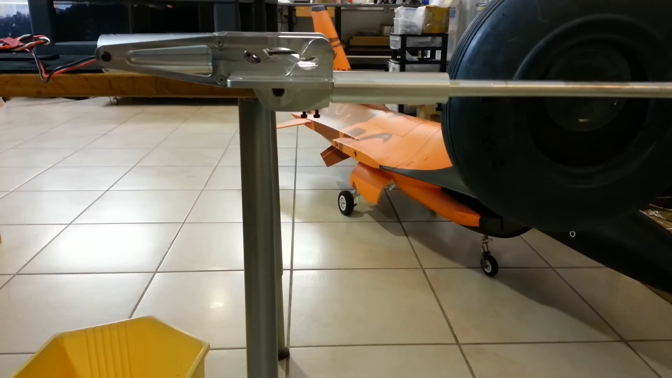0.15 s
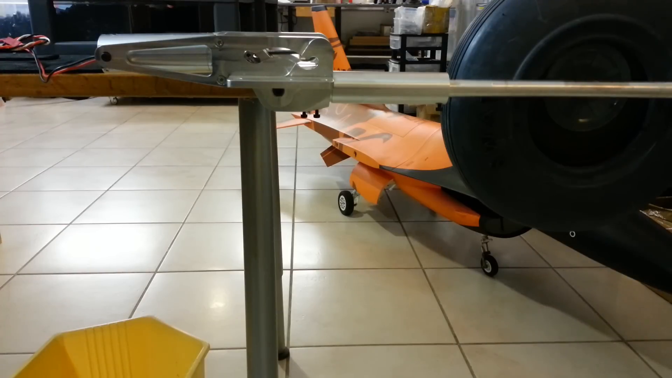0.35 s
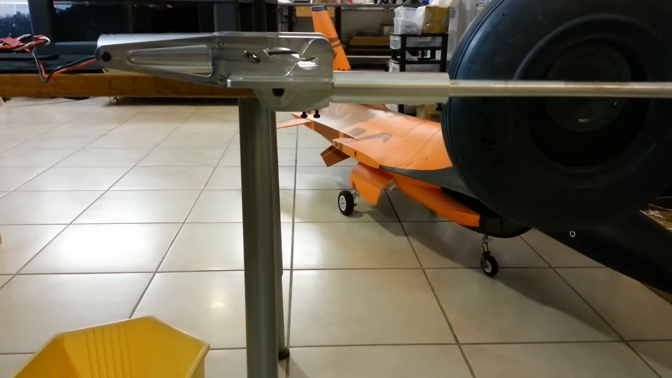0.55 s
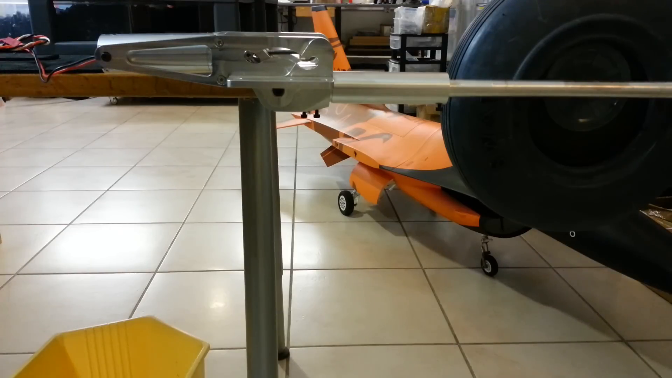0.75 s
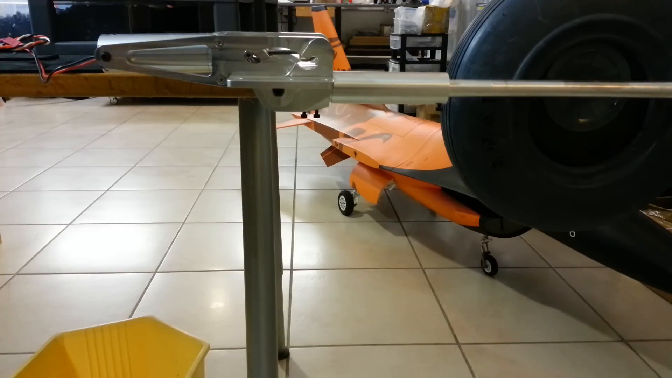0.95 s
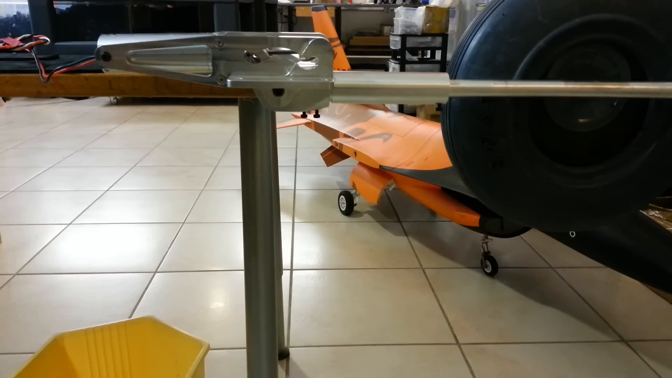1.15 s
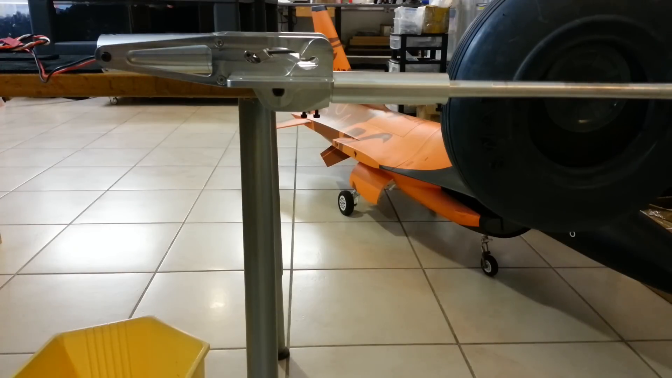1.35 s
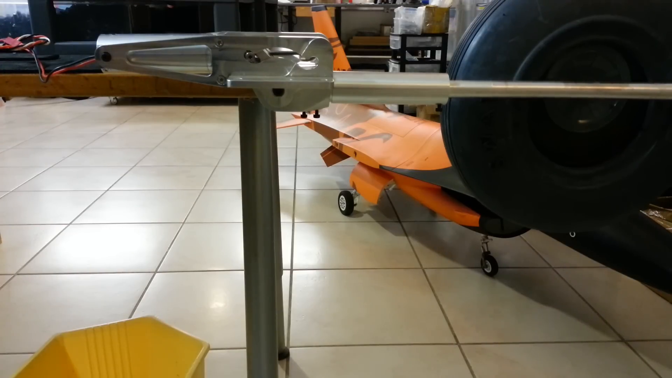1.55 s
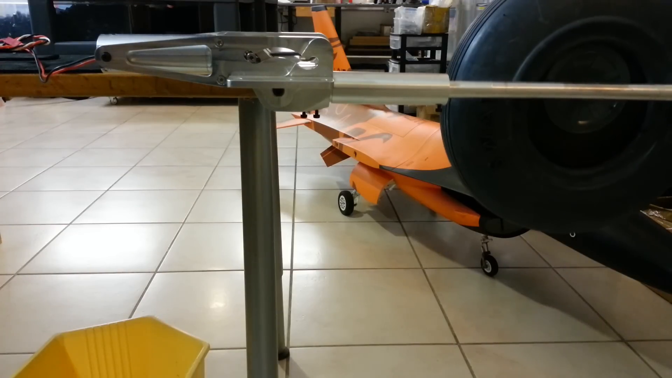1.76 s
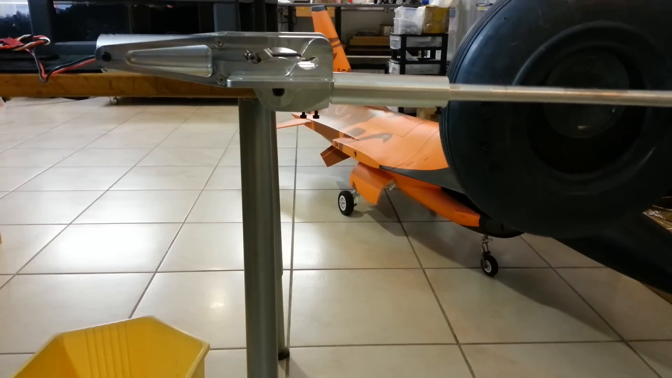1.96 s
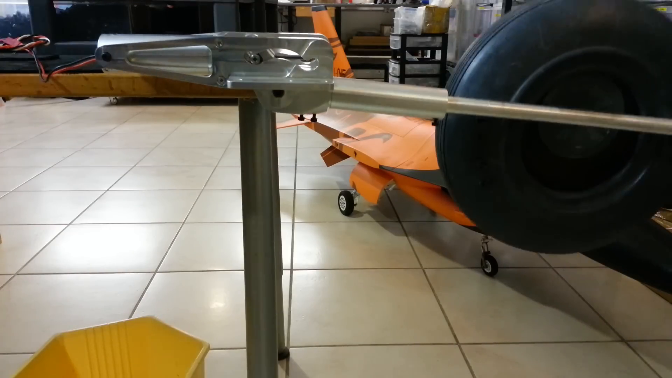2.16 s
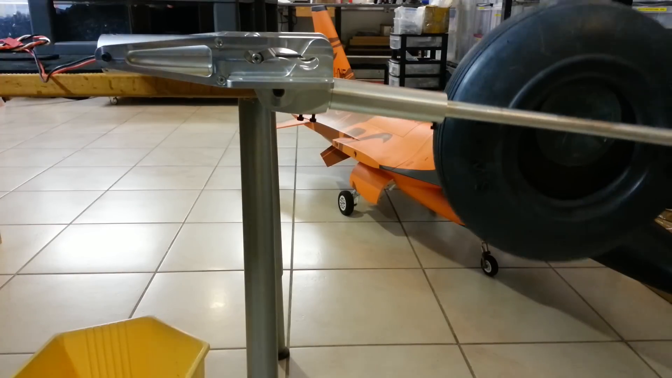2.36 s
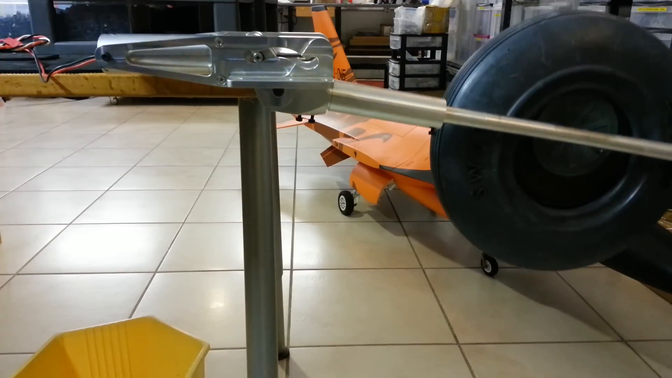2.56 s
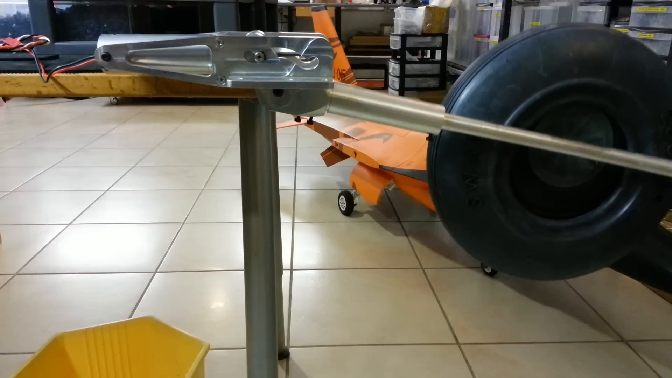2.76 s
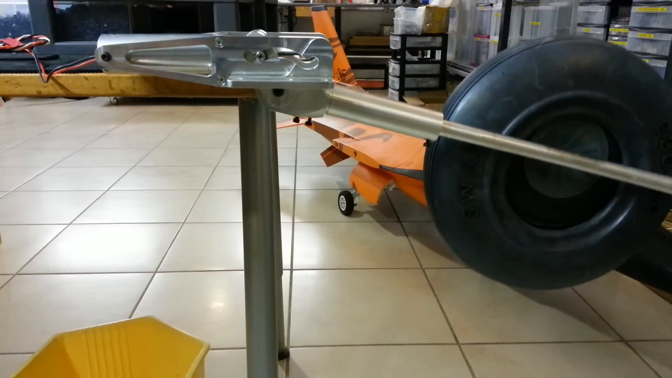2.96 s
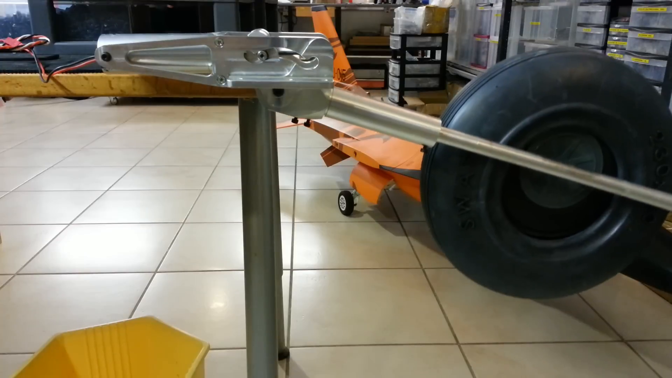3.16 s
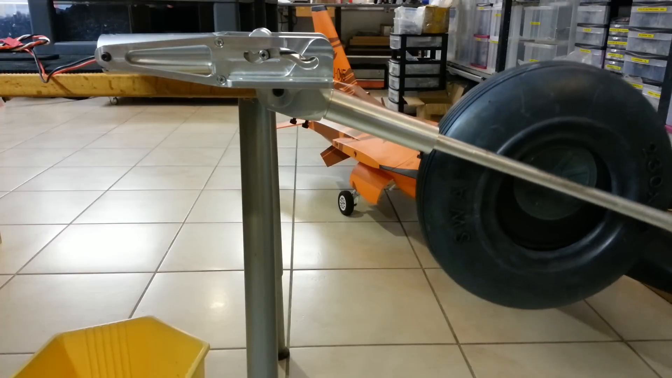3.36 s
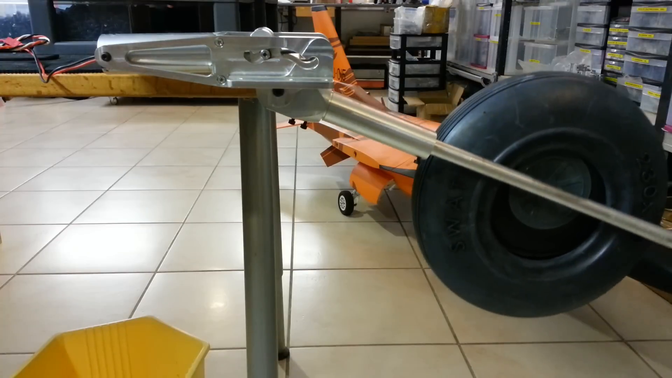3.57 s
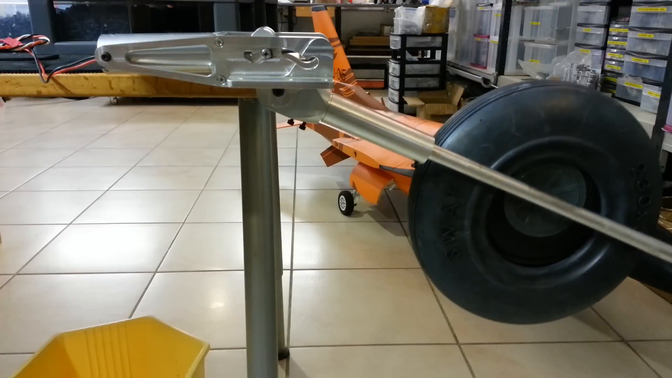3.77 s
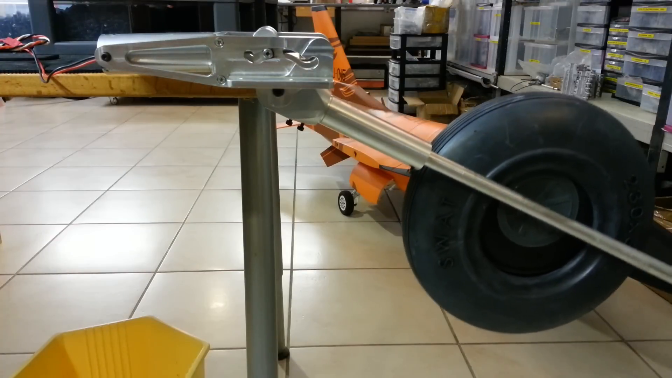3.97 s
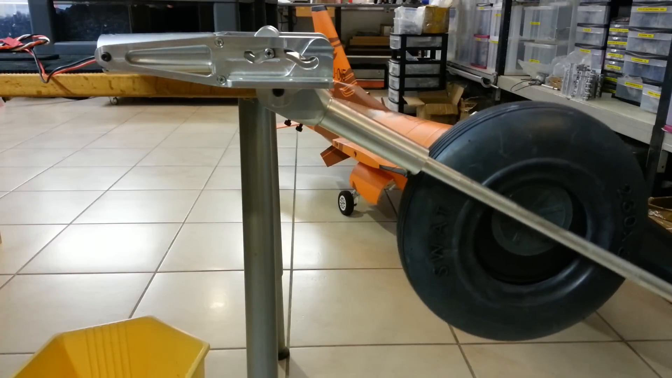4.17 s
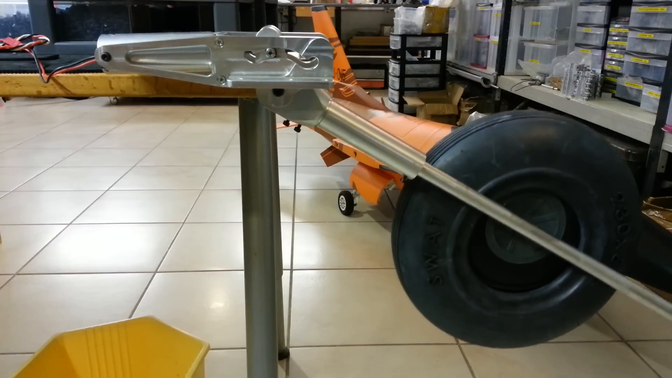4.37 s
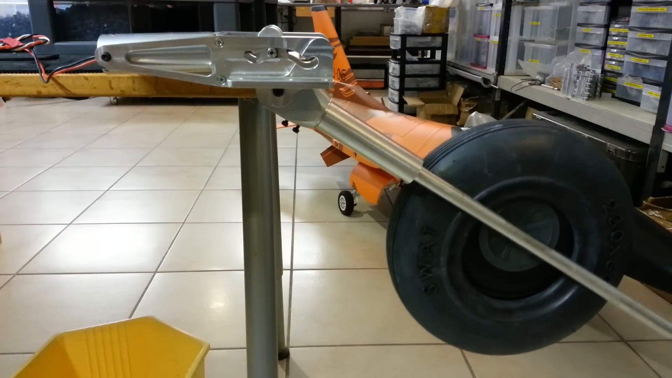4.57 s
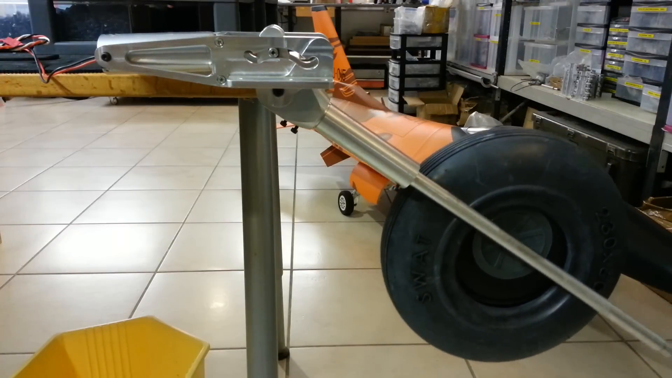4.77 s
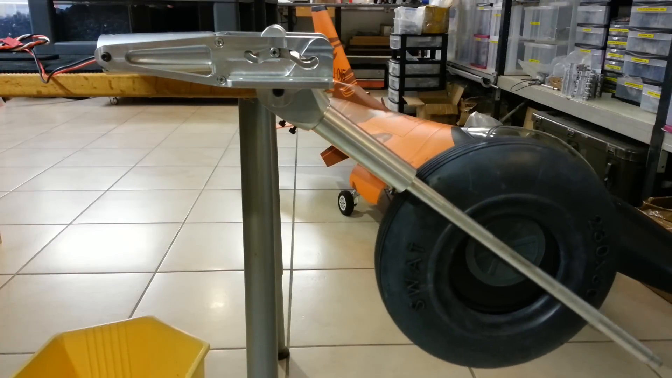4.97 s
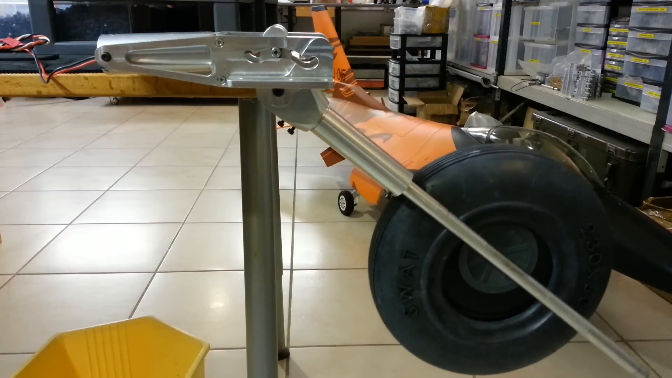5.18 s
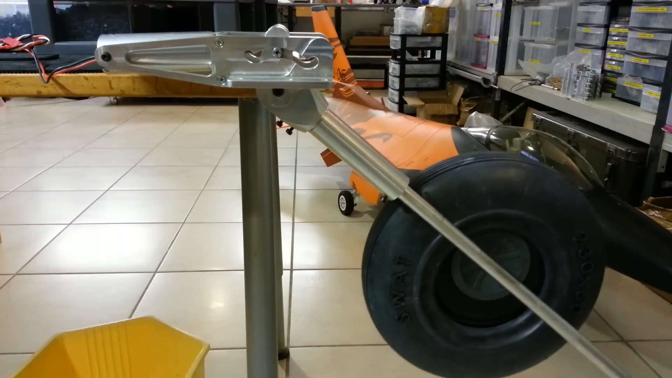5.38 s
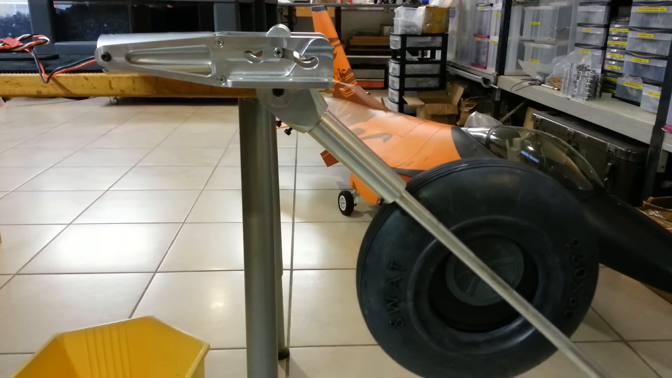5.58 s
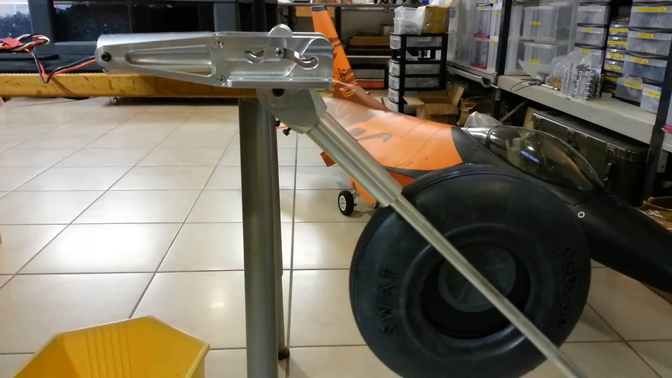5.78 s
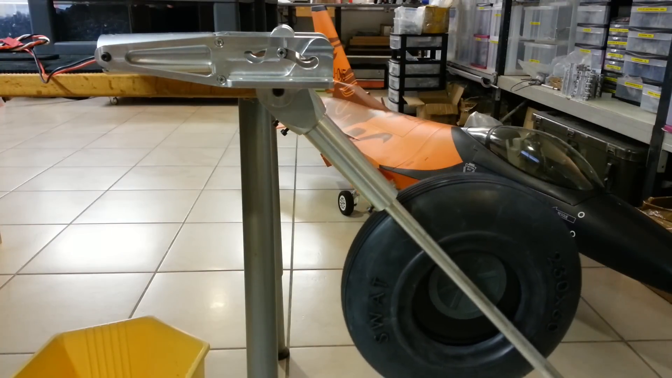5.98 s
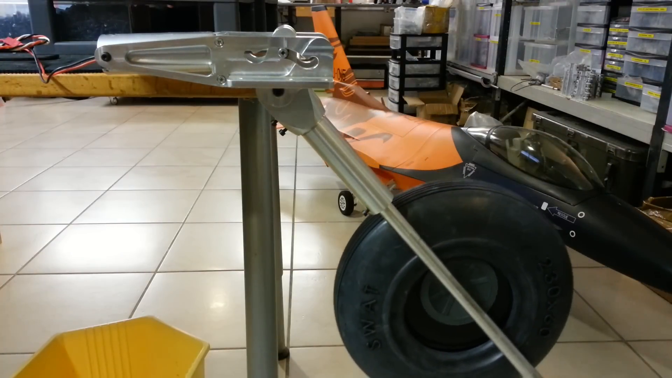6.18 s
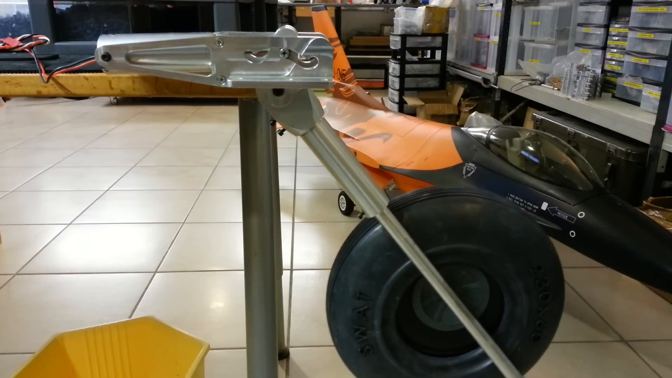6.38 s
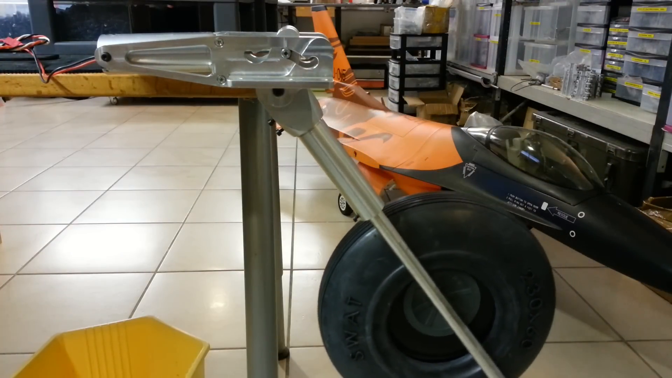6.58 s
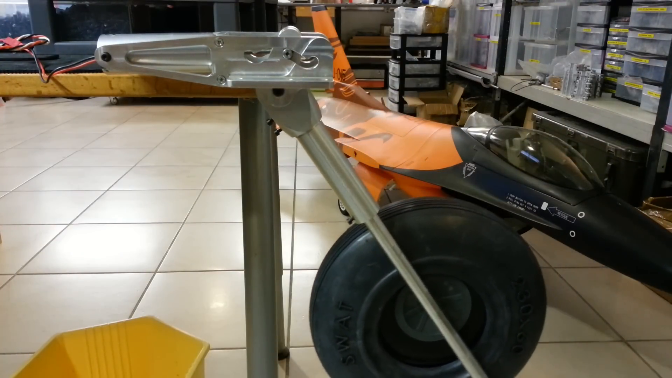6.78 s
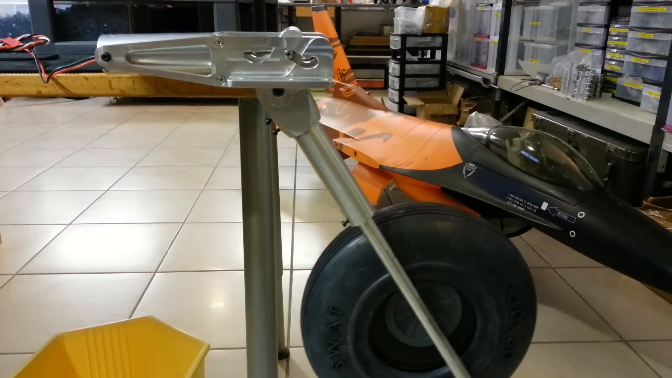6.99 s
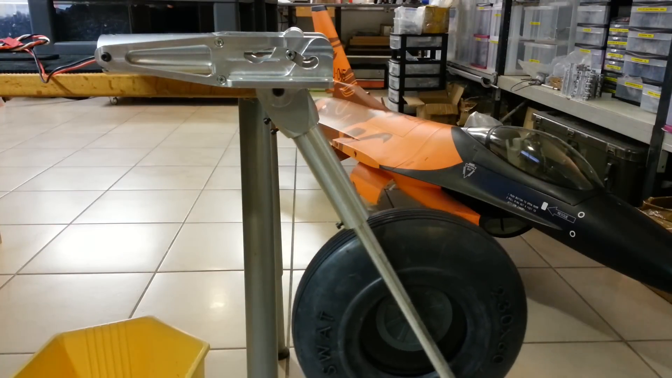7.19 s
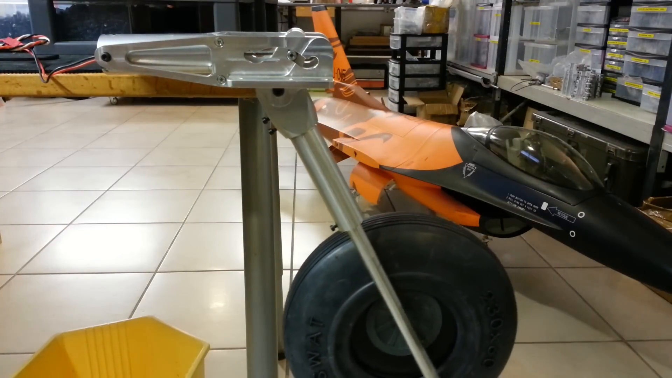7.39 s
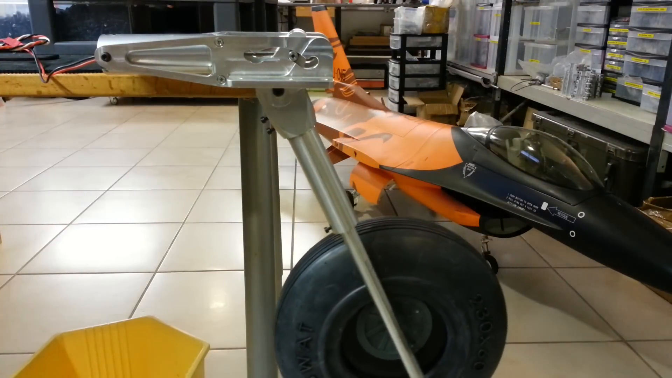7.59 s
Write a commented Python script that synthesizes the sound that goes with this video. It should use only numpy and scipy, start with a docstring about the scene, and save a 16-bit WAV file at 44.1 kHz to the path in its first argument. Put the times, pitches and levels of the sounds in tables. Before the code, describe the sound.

In a quiet workshop, faint ticks and a soft dull bump precede a small geared electric motor very close to the microphone. It spins up quickly, strains and drops in pitch, then the heavy wheel leg falls into its play with a sharp steel clack and brief rattle. A steady, raspy high whine with gear grinding continues to the end, joined by short soft chirps.

```python
"""Faint ticks and a soft bump over a quiet room hum, then a small geared electric actuator close by
swings a heavy wheel leg down on a workshop stand. The motor spins up, sags under load, lets the leg drop
into its play with a clack and a rattle, then whines steadily, with soft chirps near the end.
One shaft angle drives the tones and gear modulation; shaped noise makes the rasp, grinding and impacts."""
import sys
import numpy as np
from scipy import signal
from scipy.fft import rfft, irfft, next_fast_len
from scipy.io import wavfile
from scipy.ndimage import map_coordinates

SR = 44100
rng = np.random.default_rng(int(sys.argv[2]) if len(sys.argv) > 2 else 0)


def master(y):
    """Save y as 16-bit WAV."""
    cut = np.clip(np.atleast_2d(y).T, -1, 1)
    pcm = np.round(cut * 32767)  # scale
    wavfile.write(sys.argv[1], SR, pcm.astype(np.int16))


N = 336924

# brush and gear rasp spectrum: freq_hz, relative_db
RASP_SPECTRUM = [(1500, -53), (4500, -10.5), (6000, -9.5), (6700, 0.5), (7400, 0), (8000, -3.5),
                 (8500, -7.5), (9300, -4.5), (10000, -12), (11300, -18.5), (12400, -37), (13400, -24),
                 (14000, -22), (14600, -45)]
# motor starts to work against the leg: start_s, end_s
STRAINING_S = (1.48, 1.63)
# leg passes from high to midway: start_s, end_s
SINKING_S = (3.65, 4.55)
HIGH_ORDER = 8  # multiple of shaft speed above which tones need load or strain to sound
SIDES = np.array([[-1], [1]])  # left, right


def amp(db):
    """Amplitude factor of a level in dB."""
    return 10 ** (np.asarray(db) / 20)


def unit(x):
    """x scaled to rms 1."""
    return x / np.sqrt(np.mean(x ** 2) + 1e-20)


def along(points, hz):
    """Interpolate (freq_hz, value) points on a log frequency axis."""
    freq_hz, value = np.transpose(points)
    return np.interp(np.log(hz + 1), np.log(freq_hz + 1), value)


def curves(rows):
    """One value per sample for each column after the time."""
    time_s, *columns = np.transpose(rows)
    return [np.interp(np.arange(N) / SR, time_s, column) for column in columns]


def ramp(start_s, end_s):
    """0 before the start, 1 after the end, straight in between."""
    return np.clip((np.arange(N) / SR - start_s) / max(end_s - start_s, 1 / SR), 0, 1)


def swells(rows):
    """Level change in dB from bell-shaped (peak_s, change_db, rise_s, fall_s) swells."""
    t = np.arange(N) / SR
    return sum(db * np.exp(-((t - s) / np.where(t < s, rise, fall)) ** 2) for s, db, rise, fall in rows)


def wobble(rate):
    """Smooth random curve, rate knots a second."""
    count = int(N * rate / SR) + 4
    fine = np.arange(count * 8) / 8
    curve = map_coordinates(rng.standard_normal(count), [fine])
    return np.interp(np.arange(N) * rate / SR, fine, curve)


def filtered(x, response):
    """x times a response of frequency."""
    m = next_fast_len(N + SR // 2)
    return irfft(rfft(x, m) * response(np.fft.rfftfreq(m, 1 / SR)), m)[..., :N]


def noise(spectrum, drive=1, mono_hz=550):
    """Stereo noise of rms 1, alike on both sides in the bass and unrelated above."""
    mid, side = rng.standard_normal((2, N)) * drive
    side = filtered(side, lambda hz: np.sqrt((0.45 + (hz / mono_hz) ** 4) / (2 + (hz / mono_hz) ** 4)))
    pair = np.array([mid + side, mid - side])
    return unit(filtered(pair, lambda hz: amp(along(spectrum, hz))))


def blows(rows):
    """Envelope of sudden blows that die away, from (start_s, level_db, t60_s) rows."""
    power, t = np.zeros(N), np.arange(SR // 4) / SR
    for s, db, t60 in rows:
        power[round(s * SR):][:len(t)] += amp(db - 60 * t / t60) ** 2
    return np.sqrt(power)


def smeared(phase, rate):
    """Tone of rms 1 whose strength and phase flutter, separately on each side."""
    return unit(np.array([wobble(rate) * np.cos(phase) + wobble(rate) * np.sin(phase) for side in range(2)]))


def room(x):
    """The workshop's answer: a decaying noise tail whose top treble dies first."""
    # freq_hz, t60_s
    wall_decay = [(150, 0.4), (2000, 0.5), (12000, 0.04)]
    hz, t, z = signal.stft(rng.standard_normal((2, SR // 2)), SR, nperseg=256)
    decay = amp(-60 * t / along(wall_decay, hz)[:, None])
    tail = signal.istft(z * decay, SR, nperseg=256)[1]
    return signal.fftconvolve(x, tail / np.linalg.norm(tail[0]), axes=1)[:, :N]


def radiate(pair):
    """First noise reaches both ports directly and off nearby metal; the second arrives scattered."""
    t = np.arange(SR // 10) / SR
    near = rng.standard_normal((2, len(t))) * amp(-60 * t / .06)
    paths = amp(-9) * near / np.linalg.norm(near[0])
    paths[[0, 1], [7, 0]] += 1  # direct sound meets the right port 7 samples early
    direct = signal.fftconvolve(pair[:1], paths, axes=1)[:, :N]
    scattered = np.array([np.roll(pair[1], 7), -pair[1]]) * amp(-4)
    return unit(direct + scattered) * pair.std()


def background(air_db=-77):
    """Still air as shaped noise, and a faint hum of sines that waver slightly in level."""
    # freq_hz, relative_db
    air_spectrum = [(25, -15), (54, -10), (76, -8), (400, -11.5), (1000, -19), (3500, -22), (7500, -33),
                    (14000, -39.5)]
    # freq_hz, rms_db
    hum_lines = [(398.4, -79.5), (2229, -92)]
    t = np.arange(N) / SR
    hum = sum(np.sqrt(2) * amp(db + wobble(5.0)) * np.sin(2 * np.pi * hz * t) for hz, db in hum_lines)
    return amp(air_db) * noise(air_spectrum) + hum


def handling(wet_db=-12):
    """Small noise ticks and one dull, gradual bump before the motor starts."""
    # start_s, level_db, t60_s
    tick_rows = [(.078, -54, 0.093), (.083, -60, .07), (.0943, -43, 0.0045), (.098, -55, 0.069),
                 (.151, -64, .06), (.423, -64, 0.087), (.438, -64, 0.073)]
    # freq_hz, relative_db
    tick_spectrum = [(100, 11), (400, 0), (1000, 10), (1600, -2), (3500, -2), (7000, -1.5), (9000, -19),
                     (14000, -3)]
    # freq_hz, relative_db
    bump_spectrum = [(24, -27), (40, -12), (110, -8.5), (222, 0.5), (400, -15.5), (593, -17), (922, -23),
                     (1020, -24), (2780, -35), (9000, -55), (14000, -52)]
    bump_s, bump_level_db = 0.645, -48.5
    attack_s, hold_s, t60_s = 0.08, 0.068, .13  # 60 dB rise before bump_s, hold after it, then decay
    t = np.arange(N) / SR - bump_s
    drop_db = 60 * (np.maximum(-t, 0) / attack_s + np.maximum(t - hold_s, 0) / t60_s)
    ticks = blows(tick_rows) * noise(tick_spectrum)
    bump = amp(bump_level_db - drop_db) * noise(bump_spectrum, amp(1.2 * wobble(118)))
    out = ticks + bump
    return out + amp(wet_db) * room(out)


def working_db(level, straining, loaded, lowered):
    """A layer's level follows the load on the motor."""
    full_db, idle_db, slack_db, low_db = level
    return full_db + idle_db * (1 - straining) + slack_db * (1 - loaded) + low_db * lowered


def actuator(slack_tones_db=-4):
    """One shaft angle drives the tones, the whine and the gear noise; the load sets their levels."""
    # motor spins up and sags as it takes the leg's weight: time_s, shaft_hz
    spin_up = [(1.2, 197.3), (1.276, 282), (1.34, 319), (1.42, 334), (1.608, 325.7), (1.67, 297.7),
               (1.79, 282.2), (1.968, 288), (2.02, 317)]
    # then runs a little faster as the leg sinks: time_s, shaft_hz
    cruise = [(2.34, 323.5), (2.56, 316), (3.2, 318.5), (3.9, 319.7), (4.5, 320), (5.0, 321.8),
              (5.45, 323.2), (5.88, 327.2), (6.2, 327.9), (7.62, 327.7)]
    # leg's weight settles on the gears: start_s, end_s
    loading_s = (1.814, 2.18)
    # leg passes from midway to low: start_s, end_s
    lowering_s = (5.43, 5.82)
    # full_load_db, change_before_straining_db, change_before_loading_db, change_leg_low_db
    whine_level = (-16.5, -4, -0.4, -0.25)
    # full_load_db, change_before_straining_db, change_before_loading_db, change_leg_low_db
    gear_level = (-35.5, -3, 0.5, 0.26)
    # teeth catch now and then, falling leg briefly unloads them: peak_s, change_db, rise_s, fall_s
    whine_swells = [(1.55, 3, 0.027, 0.013), (1.94, 5, 0.013, 0.027), (2.168, -3.5, 0.037, 0.02),
                    (2.62, 2.5, 0.015, 0.016)]
    # grinding grows and eases: peak_s, change_db, rise_s, fall_s
    gear_swells = [(3.3, 1.5, 0.67, 0.99), (4.8, 0, 0.62, 0.23)]
    start_s, attack_s, attack_db = 1.159, 0.06, 60  # switch-on; how long and how far the sound climbs
    inrush_peak_db, inrush_decay_s = 2, 0.065  # extra noise of the starting current

    t = np.arange(N) / SR
    speed_hz, = curves(list(spin_up) + list(cruise))
    angle = 2 * np.pi * np.cumsum(speed_hz) / SR
    straining, loaded, lowered = ramp(*STRAINING_S), ramp(*loading_s), ramp(*lowering_s)
    running = (t > start_s) * amp(-attack_db * (1 - ramp(start_s, start_s + attack_s)) ** 2)
    inrush_db = inrush_peak_db * np.exp(-np.maximum(t - start_s - attack_s, 0) / inrush_decay_s)
    whine_db = working_db(whine_level, straining, loaded, lowered) + inrush_db + swells(whine_swells)
    gear_db = working_db(gear_level, straining, loaded, lowered) + inrush_db + swells(gear_swells)
    effort = amp(gear_db - gear_level[0] + slack_tones_db * (1 - loaded))

    out = shaft_hum(angle, speed_hz, loaded) + third_order(angle, speed_hz, loaded)
    out += effort * order_tones(angle, speed_hz, straining, loaded, lowered)
    out += whine(angle, whine_db, loaded, lowered)
    out += amp(gear_db) * gear_noise(angle, loaded)
    out += (1 - loaded) * slack_rattle(angle, straining)
    out += rumble() + sparks(straining, loaded) + squeaks(angle)
    return running * out + start_kick()


def shaft_hum(angle, speed_hz, loaded, lag_rad=0.24):
    """Shaft-rate sine, strongest at the stand's resonance, fluttering more while the gears are slack."""
    # hum swells and fades as the leg moves: peak_s, change_db, rise_s, fall_s
    hum_swells = [(1.5, -7.5, 0.12, 0.059), (1.56, -25, 0.017, 0.019), (1.94, -6, 0.037, .012),
                  (2.17, -13, 0.075, 0.067), (2.6, -4, 0.46, 0.75), (5.5, 4.5, 2.76, 0.21),
                  (5.86, -2.5, 0.22, 0.16)]
    peak_rms_db, stand_hz, half_width_hz = -37, 309.7, 19.2
    off_resonance_db = 10 * np.log10(1 + ((speed_hz - stand_hz) / half_width_hz) ** 2)
    flutter_db = 0.55 * wobble(25) + 2.5 * (1 - loaded) * wobble(71)
    level = amp(peak_rms_db - off_resonance_db + swells(hum_swells) + flutter_db)
    return np.sqrt(2) * level * np.sin(angle + lag_rad * SIDES)


def spun_up(speed_hz):
    """Overtones only stand out near full speed."""
    return np.clip(speed_hz / 285, 0, 1) ** 8


def beating(angle):
    """Level swing in dB as the slow gear presses and eases once a turn."""
    # beating is deepest around midway: peak_s, share, rise_s, fall_s
    beat_swell = (4.9, 1, 1.1, .8)
    press_s, swing_db = 4.812, 2.8  # one moment of hardest pressing; scale of the swing
    shaft_turns = 44  # per turn of the slow gear
    slow = (angle - np.interp(press_s, np.arange(N) / SR, angle)) / shaft_turns
    return swing_db * swells([beat_swell]) * (np.cos(slow) + .5 * np.cos(2 * slow))


def third_order(angle, speed_hz, loaded, lag_rad=0.24):
    """Third shaft harmonic, swelling as the leg moves and beating with the slow gear."""
    # peak_s, change_db, rise_s, fall_s
    third_swells = [(1.285, 5, 0.02, 0.03), (1.55, 7, 0.045, 0.022), (1.61, -4, .03, .03),
                    (1.87, 12, 0.13, 0.12), (1.905, 9, .02, .017), (2.95, 8.5, 0.26, 0.27),
                    (3.45, -3, 0.3, 0.4), (5.85, 10, 0.8, 0.36), (7.58, 10.5, 0.8, 0.41)]
    base_rms_db = -48
    flutter_db = 1.4 * wobble(40) + 2.5 * (1 - loaded) * wobble(90)
    level = amp(base_rms_db + swells(third_swells) + beating(angle) + flutter_db)
    phase = 3 * (angle + lag_rad * SIDES) + 0.31 * wobble(45)
    return np.sqrt(2) * spun_up(speed_hz) * level * np.sin(phase)


def order_tones(angle, speed_hz, straining, loaded, lowered, trim_db=-1.04, flutter_db=3.0, blur_rad=0.043):
    """Weaker shaft and gear sines locked to the shaft, out of step between the two ports."""
    # before trim: shaft_multiple, leg_high_db, leg_midway_db, leg_low_db
    order_rows = [(0.5, -61, -63, -59), (0.543, -66, -62, -58.5), (0.76, -49.5, -56, -51.5),
                  (0.869, -50, -47.5, -45.5), (1.193, -58, -59, -57), (1.25, -55, -61, -70),
                  (1.91, -66, -64, -60), (2, -61, -61, -61), (2.25, -70, -64, -65), (2.455, -62, -65, -70),
                  (2.545, -70, -70, -61), (2.91, -60, -62, -69), (3.455, -70, -64, -57),
                  (3.91, -66, -59, -56), (4, -55, -51.5, -54), (4.455, -53, -49.5, -53.5),
                  (5, -52, -59, -56.5), (5.455, -54, -56, -60), (6, -63, -58, -49.5),
                  (6.455, -63, -62, -57), (7, -65, -64, -56), (7.455, -59, -67, -64), (8, -63, -68, -69),
                  (9.91, -64, -64, -68), (10.91, -59, -59, -55), (12, -55, -56, -58), (13, -61, -62, -59),
                  (14.88, -57, -58, -64), (16.37, -58, -59, -54), (17.455, -52, -52, -48.5),
                  (18.4, -58, -58, -63), (19, -53, -53, -57)]
    leg_hz, leg_half_width_hz, leg_peak_db = 1420, 40, 12.5  # resonance of the leg while it hangs slack
    uneven = angle + blur_rad * wobble(50)  # uneven turning blurs the high orders most
    sunk, pulling = ramp(*SINKING_S), straining * (1 - loaded)
    out = np.zeros((2, N))
    for order, high_db, midway_db, low_db in order_rows:
        # the fifth order swells where it crosses the slack leg's resonance
        detune = (order * speed_hz - leg_hz) / leg_half_width_hz
        swell_db = leg_peak_db * pulling * (order == 5) / (1 + detune ** 2)
        position_db = high_db + (midway_db - high_db) * sunk + (low_db - midway_db) * lowered
        level = amp(trim_db + position_db + swell_db + flutter_db * wobble(11))
        level *= loaded if order > HIGH_ORDER else 1
        spread_rad = min(order / 4, 1) * rng.normal(.7, .08) * rng.choice([-1, 1])
        out += level * np.sin(order * uneven + 0.3 * wobble(15) + spread_rad * SIDES)
    return np.sqrt(2) * spun_up(speed_hz) * out


def whine(angle, whine_db, loaded, lowered, rasp_db=-17):
    """Brushes and teeth scrape in tiny random bursts, throbbing with the shaft and next gear; orders sing."""
    # smeared high orders, re whine: shaft_multiple, leg_high_db, leg_low_db, flutter_knots_per_s
    singing_orders = [(20.2, -45, -35, 50), (21.85, -26, -28, 70), (22.92, -26.5, -30, 80),
                      (23.95, -25.5, -28.5, 70), (24.95, -33, -38, 70), (27, -38, -38, 70),
                      (28.95, -39, -39, 90)]
    shaft_turns = 11  # per turn of the next gear
    throb = (1 + .25 * np.cos(angle)) * (1 + .13 * np.cos(angle / shaft_turns))
    grains = amp(2.1 * wobble(1300))
    out = amp(rasp_db) * radiate(noise(RASP_SPECTRUM, throb * grains))
    for order, high_db, low_db, rate in singing_orders:
        level = amp(high_db + (low_db - high_db) * lowered)
        out += loaded * level * smeared(order * angle, rate)
    return out * amp(whine_db)


def gear_noise(angle, loaded, split_hz=520, slack_db=-4.0, sunk_db=-1):
    """Grinding teeth shake the frame: bass grows with load and eases as the leg sinks; treble scatters."""
    # gear noise through the frame: freq_hz, relative_db
    frame_spectrum = [(130, -2), (160, 3), (190, 5.5), (250, 9.5), (380, 8.5), (490, -2.5), (720, -6.5),
                      (900, -7), (1150, -8), (1400, -4.5), (1900, -5.5), (2700, -8), (3200, -7),
                      (4700, -5.5), (6000, -5.5), (7500, -21)]
    grains = amp(2.6 * wobble(700) + .8 * wobble(14))
    grind = noise(frame_spectrum, grains * (1 + 0.017 * np.cos(angle)))
    bass = filtered(grind, lambda hz: 1 / (1 + (hz / split_hz) ** 6))
    bass_db = slack_db * (2.5 - loaded) + sunk_db * ramp(*SINKING_S)
    shake = amp(bass_db) * bass + radiate(grind - bass)
    # the thin frame cannot radiate deep bass
    return filtered(shake, lambda hz: hz ** 6 / (hz ** 6 + 120 ** 6))


def slack_rattle(angle, straining, rate=50):
    """Teeth with open play rattle in rough bands that glide with the shaft; the high ones need strain."""
    # shaft_multiple, level_db before swells
    slack_orders = [(1.5, -60), (2, -57), (2.55, -58), (3, -52), (4, -59), (5, -56), (6, -60), (8.5, -63),
                    (11, -64), (12, -61.5)]
    # peak_s, change_db, rise_s, fall_s
    slack_swells = [(1.22, 3, .04, .05), (1.45, -3, .15, .12), (1.585, 7, .015, .018), (1.99, 5, .1, .06)]
    bands = 0
    for order, db in slack_orders:
        strain = straining if order > HIGH_ORDER else 1
        bands = bands + amp(db) * strain * smeared(order * angle, rate)
    return amp(swells(slack_swells)) * bands


def rumble(lumps_db=5):
    """Slow, uneven lumps of low noise."""
    # freq_hz, relative_db
    rumble_spectrum = [(20, -16), (55, 0), (88, 0), (130, -18), (300, -60)]
    # peak_s, change_db, rise_s, fall_s
    rumble_swells = [(1.5, 13, 0.37, 0.37), (5.7, 8.5, .35, 0.4), (7.1, 10, 0.46, 0.15)]
    base_db = -69.5
    lumps = unit(amp(lumps_db * wobble(16)) * noise(rumble_spectrum, mono_hz=50))
    return amp(base_db + swells(rumble_swells)) * lumps


def start_kick(level_db=-39):
    """The teeth take up their play as the motor starts: one short noise blow."""
    return blows([(1.184, level_db, 0.0062)]) * noise(RASP_SPECTRUM)


def sparks(straining, loaded, level_db=-44.5):
    """The brushes fizz in high, grainy noise while the motor strains and the gears are not yet loaded."""
    # freq_hz, relative_db
    spark_spectrum = [(8000, -40), (10800, -5), (12200, -1), (13600, 4), (14600, -7.5)]
    fizz = noise(spark_spectrum, amp(2.5 * wobble(900)))
    return amp(level_db) * straining * (1 - loaded) * fizz


def knocks(count=14):
    """The leg drops into its play in set knocks, then the loose joint chatters at random among them."""
    # start_s, crack_db, ring_db, thud_db
    main_knocks = [(2.0425, -15.5, -32, -39), (2.0448, -14.5, -26, -40), (2.0488, -30, -24, -33),
                   (2.059, -38, -28, -33), (2.0752, -35, -25.5, -19.5), (2.0805, -40, -36, -30),
                   (2.106, -42, -29, -40), (2.114, -40, -38, -29), (2.13, -42, -46, -30)]
    delay_s, length_s = .014, .11  # chatter after the first knock
    crack_db, ring_db, thud_db, fade_db = -50, -36, -36, 8  # chatter levels before fade and random size
    chance = rng.uniform(-1.04, 1, (count, 2))
    progress = (np.arange(count) + .5 + .5 * chance[:, 0]) / count
    size_db = 3 * chance[:, 1] - fade_db * progress
    times_s = main_knocks[0][0] + delay_s + length_s * progress
    chatter = zip(times_s, crack_db + size_db, ring_db + size_db, thud_db + size_db)
    return list(main_knocks) + list(chatter)


def clack(crack_t60=0.05, ring_t60=0.1, thud_t60=0.052, puff_db=-5, wet_db=-9):
    """Each knock cracks and rings in steel-shaped noise, and thuds in noise and the stand's low modes."""
    # resonances of the leg and its mount: freq_hz, relative_db
    steel_spectrum = [(300, -9), (900, -5), (1450, -11), (1780, 10), (2150, -2), (2500, 1.5), (3600, -5.5),
                      (4600, 3), (6200, 3), (7200, 13.5), (8300, -28), (9500, 0), (11500, -5.5),
                      (13800, 4.5)]
    # freq_hz, relative_db
    thud_spectrum = [(60, -34), (120, -30), (160, 2), (200, -2), (270, 10), (450, 1), (600, -12),
                     (800, -0.5), (1300, -5), (3000, -14), (6000, -40)]
    # low modes of the stand, re thud: freq_hz, relative_db, t60_s
    stand_modes = [(158.4, -9.5, 0.27), (262, 0, .055), (460, 1, 0.045), (850, -7, 0.05)]
    times_s, crack_db, ring_db, thud_db = np.transpose(knocks())
    t = np.arange(SR // 2) / SR
    ring = unit(filtered(noise(steel_spectrum), lambda hz: 1 / (1 + (hz / 5500) ** 6)))
    out = blows([(s, db, crack_t60) for s, db in zip(times_s, crack_db)]) * noise(steel_spectrum)
    out += blows([(s, db, ring_t60) for s, db in zip(times_s, ring_db)]) * ring
    out += blows([(s, db + puff_db, thud_t60) for s, db in zip(times_s, thud_db)]) * noise(thud_spectrum)
    for s, blow_db in zip(times_s, thud_db):
        for hz, db, t60 in stand_modes:
            mode = amp(blow_db + db - 60 * t / t60) * np.sin(2 * np.pi * hz * t)
            # fades in over one cycle
            out[:, round(s * SR):][:, :len(t)] += mode * np.minimum(t * hz, 1)
    return out + amp(wet_db) * room(out)


def squeaks(angle, waver_rad=.6):
    """Near the end of the swing the mesh rubs in short, soft chirps at the wavering gear mesh tone."""
    # bell-shaped: peak_s, level_db, half_length_s
    chirp_rows = [(6.215, -47, .017), (6.352, -47, .017), (6.492, -48.5, .022), (6.578, -45, .015),
                  (6.632, -46, .016), (6.722, -45, .016), (6.776, -40, .013), (6.906, -37.5, .02),
                  (6.995, -44, .016), (7.042, -36, .024), (7.132, -39, .018), (7.205, -42, .027),
                  (7.308, -41, .02), (7.44, -40.5, .02), (7.575, -39, .019)]
    mesh_order = 60 / 11  # multiple of shaft speed
    t = np.arange(N) / SR
    press = sum(amp(db) * np.exp(-((t - s) / half_s) ** 2) for s, db, half_s in chirp_rows)
    phase = mesh_order * angle + waver_rad * wobble(60)
    return press * unit(np.array([np.sin(phase + 0.73 * wobble(60)) for side in range(2)]))


def scene():
    """Room, handling, actuator and clack together."""
    return background() + handling() + actuator() + clack()


def record(dry, hiss_db=-83):
    """Right port colours the treble, microphones hiss, peaks are rounded off, the band is limited."""
    # right microphone port rings in the treble: freq_hz, gain_db
    port_response = [(1500, -0.5), (6100, 1.5), (6550, 7), (7000, 15.5), (7500, 17), (8000, 18), (9300, 15),
                     (10000, 10), (11300, 12.5), (12300, 7), (14000, -8.5)]
    top_hz = 14550
    ports = np.array([dry[0], filtered(dry[1], lambda hz: amp(along(port_response, hz)))])
    ports = ports + amp(hiss_db) * rng.standard_normal((2, N))
    rounded = ports / (1 + (ports / .9) ** 6) ** (1 / 6)
    return filtered(rounded, lambda hz: hz < top_hz)


dry = scene()
out = record(dry)
master(out)
```